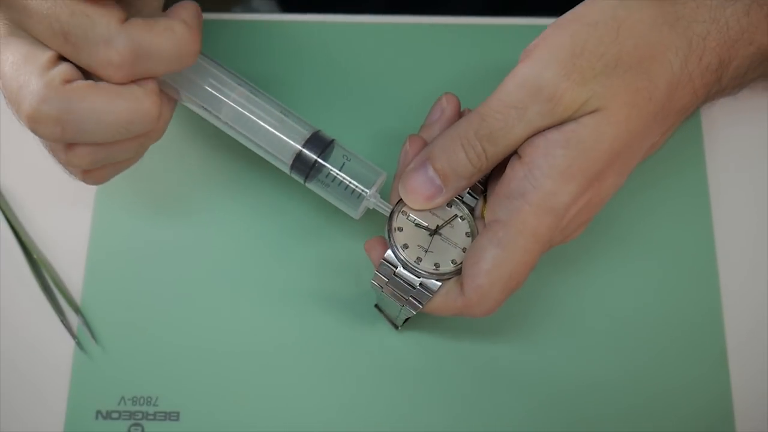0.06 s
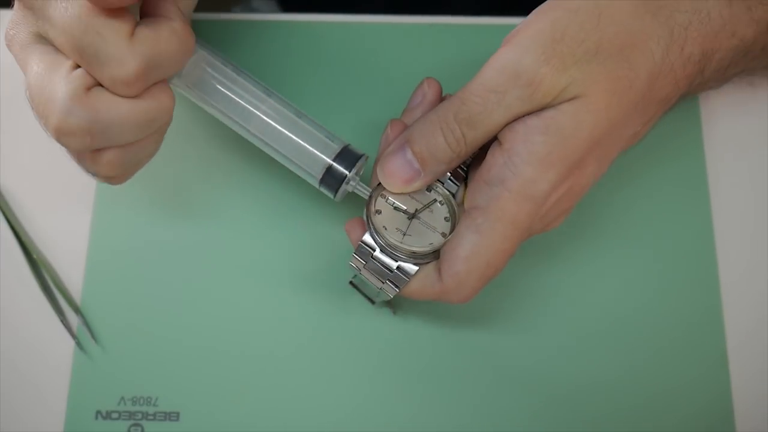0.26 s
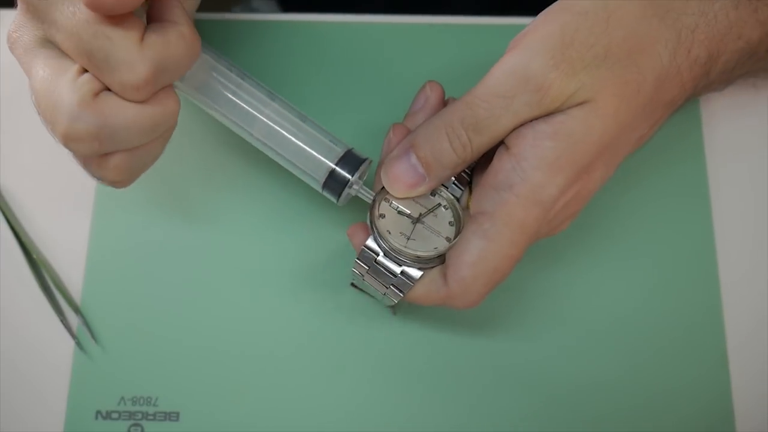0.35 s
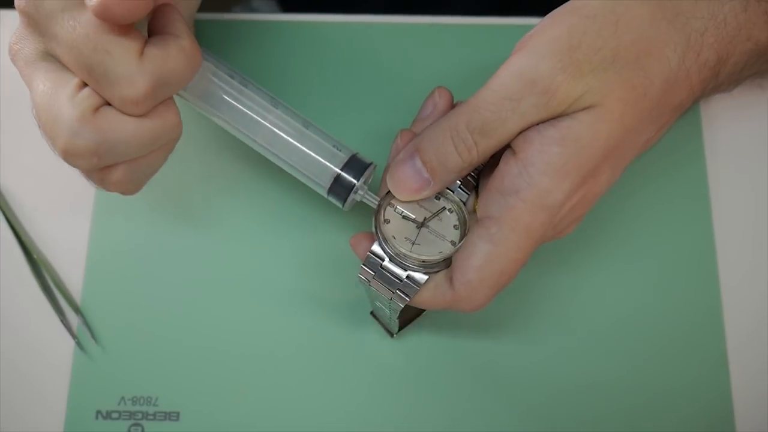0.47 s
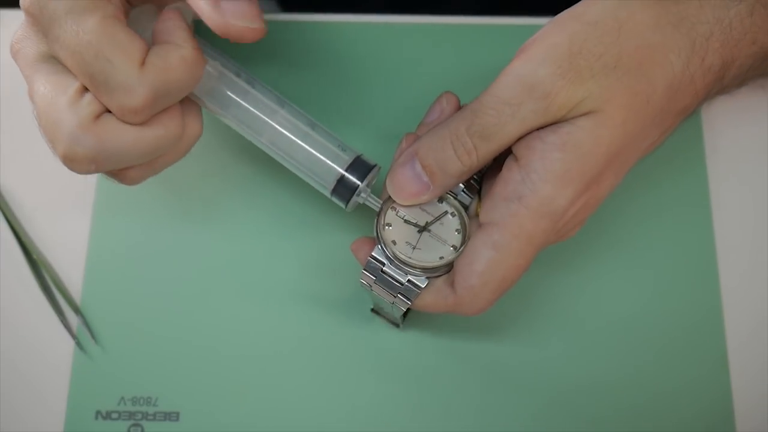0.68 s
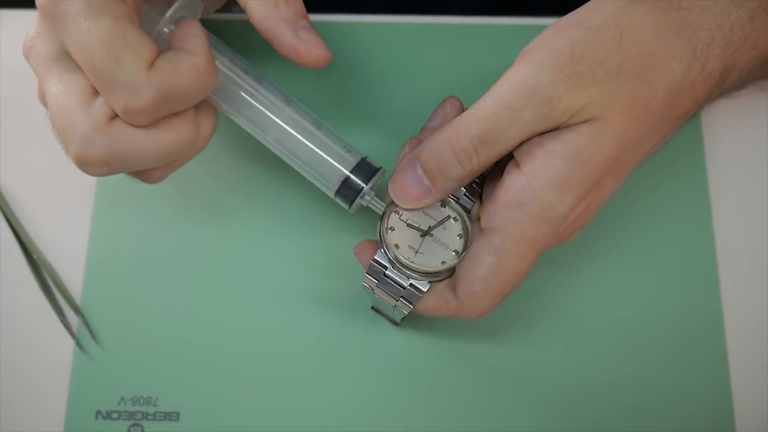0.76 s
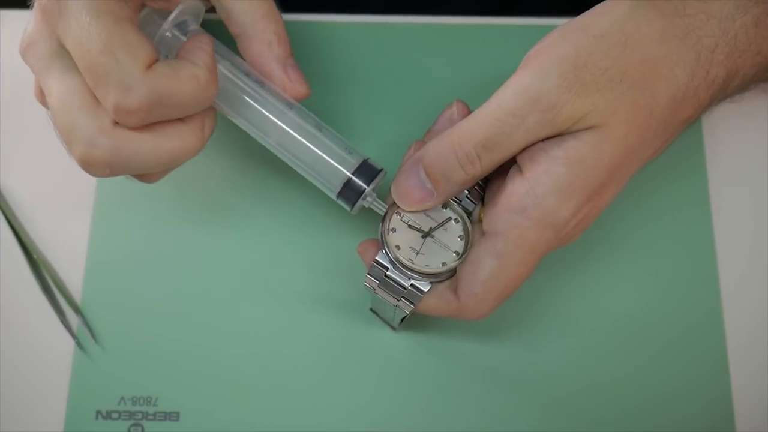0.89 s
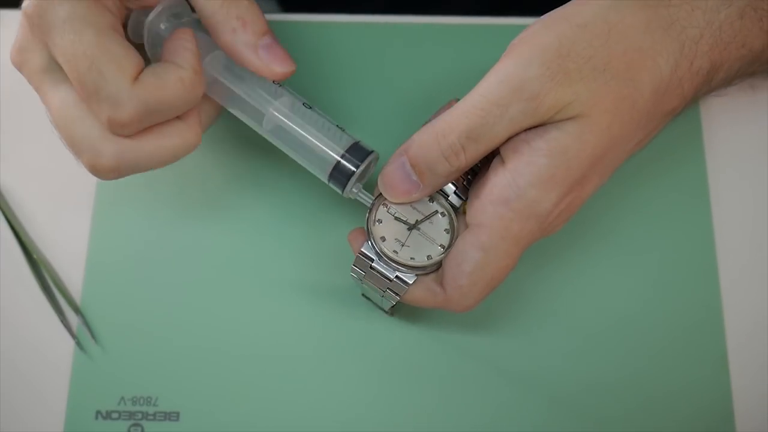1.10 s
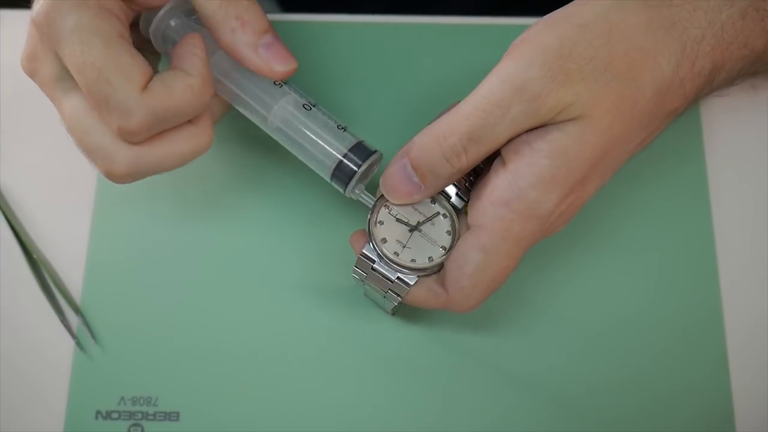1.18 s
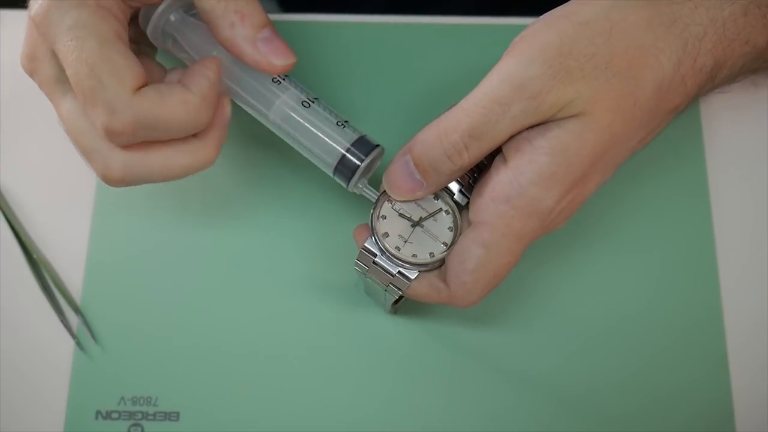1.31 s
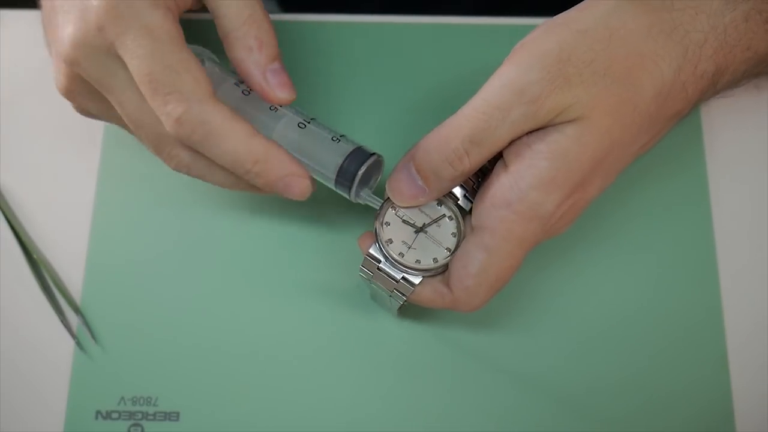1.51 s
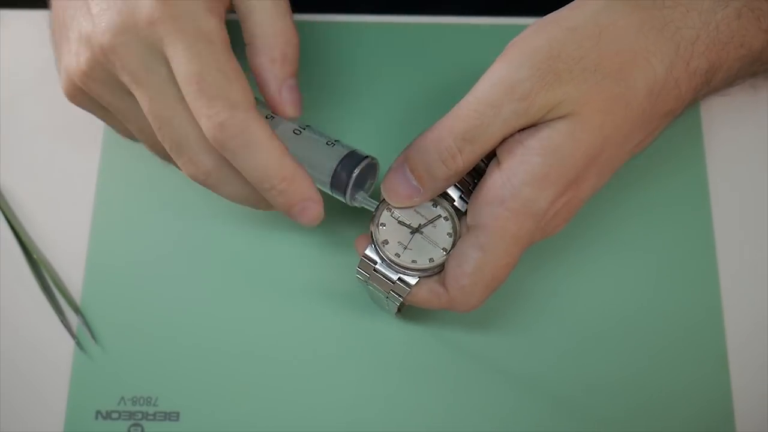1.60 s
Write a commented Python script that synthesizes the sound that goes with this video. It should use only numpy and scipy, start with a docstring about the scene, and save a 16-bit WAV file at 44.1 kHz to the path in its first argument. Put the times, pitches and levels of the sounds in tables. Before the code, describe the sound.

A sharp, loud pop bursts from a plastic syringe at about 0.2 seconds, close by, echoing briefly in a small room. A short hiss of air and a tiny snap follow. The plastic ticks lightly around 0.6 seconds. From 1.1 to 1.3 seconds come a faint finger slide, soft plunger knocks and thin clinks of a steel watch bracelet, over very quiet rustle and hum.

```python
"""In a small quiet room, a plastic syringe is pressed against a steel watch, close to the microphone.
The rubber seal slips and the trapped air lets go with one sharp pop that rings the barrel and watch
case and fills the room. A short hiss of air follows. Then the plastic ticks and knocks as the grip
changes, a finger slides along the barrel and the steel bracelet clinks, over a faint hiss and hum."""
import sys
import numpy as np
from scipy import signal
from scipy.fft import rfft, irfft, next_fast_len
from scipy.io import wavfile
from scipy.ndimage import uniform_filter1d

SR = 44100
rng = np.random.default_rng(int(sys.argv[2]) if len(sys.argv) > 2 else 0)


def master(y):
    """Save y as 16-bit WAV."""
    cut = np.clip(np.atleast_2d(y).T, -1, 1)
    pcm = np.round(cut * 32767)  # scale
    wavfile.write(sys.argv[1], SR, pcm.astype(np.int16))


N = 72765  # 1.65 seconds

# How the barrel and watch case ring. Each row: pitch in Hz, width in Hz, relative level in dB.
POP_MODES = [(248, 540, -9.5), (555, 130, -1), (1323, 200, -0.5), (2006, 180, 2.5), (2216, 290, -0.5),
             (3290, 490, -11), (3960, 220, -12), (5270, 820, -15.5), (9325, 1100, -25.5),
             (13800, 2400, -33.5)]
# Echoes from the desk and near things. Each row: delay in seconds, relative level in dB.
NEAR_ECHOES = [(.0011, -16), (.0044, -15)]
# Where the pop sits in stereo. Each row: frequency in Hz, left minus right in dB.
POP_BALANCE = [(30, -6), (120, 0), (500, 1), (2000, -1), (8000, 1.5)]
# Plastic ticks. Each row: start in seconds, level in dB, tilt toward the treble in dB per octave.
TICKS = [(.5911, -49.5, 3.5), (.5983, -38.5, 1), (.6308, -53.5, -0.5), (1.1362, -59, -8), (1.1455, -50, -6)]
# Plunger knocks and bracelet clinks. Each row: start in seconds, level in dB.
KNOCKS = [(.8125, -57.5), (1.1643, -44), (1.1671, -46), (1.3035, -53), (1.3135, -49), (1.3235, -52)]
CLINKS = [(.897, -61), (1.1660, -45), (1.1690, -50), (1.2028, -61.5), (1.2658, -59.5), (1.2982, -53.5),
          (1.3055, -55)]
# How each part rings. Each row: pitch in Hz, relative level in dB, seconds to fade by 60 dB (T60).
TICK_MODES = [(1860, -5, 0.013), (2280, -4, 0.022), (3140, -5, 0.012), (4730, 1, 0.006), (5105, -1, 0.011),
              (8700, -18.5, 0.0084)]
KNOCK_MODES = [(297, -14, 0.045), (547, -2.5, 0.032), (870, -10.5, 0.028), (1056, -4, 0.046),
               (1328, -11.5, 0.061), (1554, -4, 0.025), (2040, -7, 0.0078)]
CLINK_MODES = [(8198, -7, 0.045), (8802, -5, 0.012), (9370, -3.5, 0.02), (10350, -3.5, 0.0097),
               (12060, -16, .07)]
# Finger slides. Each row: loudest moment in seconds, width in seconds, level in dB.
SLIDES = [(0.539, 0.027, -73), (1.073, 0.053, -66.5)]
# How the rustle and hum swell. Each row: time in seconds, level in dB.
RUSTLE_LEVEL = [(0, -80), (.5, -73.5), (.66, -65.5), (.76, -73), (1, -69.5), (1.5, -69.5)]
HUM_LEVEL = [(.7, -76), (.85, -65.5), (1.1, -97), (1.3, -69.5)]
# The colour (mix of low and high) of each noise. Each row: frequency in Hz, relative level in dB.
POP_ROOM_COLOUR = [(40, -43.5), (85, -28), (130, -10), (210, -16.5), (380, -4), (620, -2), (760, -6),
                   (1020, -6.5), (1350, 0.5), (2350, -4), (2850, -20), (3500, -14.5), (5000, -22),
                   (6500, -31), (11000, -33), (15000, -45.5)]
JET_COLOUR = [(3000, -34), (5000, -2.5), (7500, -5), (8800, 1), (11500, -4.5), (15000, -22.5)]
SCUFF_COLOUR = [(300, -22.5), (900, -16.5), (1330, -1.5), (3000, -24.5), (12000, -42)]
SNAP_COLOUR = [(1200, -20), (2400, 3), (8000, -9.5), (11000, -14), (15000, -53)]
HARD_CONTACT_COLOUR = [(1500, -8), (7000, -7), (8500, -2), (13000, 1), (16000, -11)]
SOFT_CONTACT_COLOUR = [(80, -38), (380, 1), (1600, -8), (3400, -9.5), (15000, -51)]
SLIDE_COLOUR = [(2000, -17.5), (8200, -9.5), (9450, 6.5), (10500, -14), (15000, -27)]
RUSTLE_COLOUR = [(60, -12.5), (130, -1), (450, -4), (900, -13), (15000, -39)]
ROOM_TONE_COLOUR = [(25, -34), (140, -2.5), (274, -11.5), (800, -17.5), (1500, -20.5), (7500, -28.5),
                    (10200, -27.5), (14000, -31.5), (16000, -44)]
# Room notes that ring on after the pop. Each row: pitch in Hz, relative level in dB.
ROOM_MODES = [(532.9, -50), (635.2, -52.5), (1362, -56.5), (1593, -53), (2051, -54), (2342, -59.5)]
# How long the room echoes. Each row: frequency in Hz, seconds to fade by 60 dB.
ROOM_T60 = [(100, 1), (400, 0.53), (1500, 0.5), (5000, 0.44), (12000, .22)]
# Stereo width. Each row: frequency in Hz, level of the sides against the middle in dB.
ROOM_WIDTH = [(60, -6), (500, -11.5), (12000, -7.5)]
BACKGROUND_WIDTH = [(900, 2.5), (15000, -6.5)]

POP_S = .2327  # when the air lets go
# How long the wash after the pop stays level, probably from the recorder's automatic gain, before fading.
WASH_HOLD_S = .05


def pop(direct_db=-2, room_db=7, lag_s=7e-6):
    """One puff of air rings the barrel and watch case, and the room answers with a long wash."""
    start = round(POP_S * SR)
    puff = np.zeros(N)
    puff[start] = 1
    direct = filtered(puff, barrel_response)
    wash = np.pad(room_tail(POP_ROOM_COLOUR, WASH_HOLD_S), ((0, 0), (start, 0)))[:, :N]
    pair = amp(direct_db) * direct / np.abs(direct).max() + amp(room_db) * wash
    half = np.array([[.5], [-.5]])  # left and right each take half of the balance and lag
    return filtered(pair, lambda hz: amp(half * along(POP_BALANCE, hz))
                    * np.exp(2j * np.pi * hz * half * lag_s))


def barrel_response(hz, notch_hz=2824, notch_width_hz=1600):
    """The barrel and watch case boost some pitches and leave a hollow; near things add dull echoes."""
    body = sum((-1) ** k * amp(db) * 1j * hz * width / (pitch ** 2 - hz ** 2 + 1j * hz * width)
               for k, (pitch, width, db) in enumerate(POP_MODES))
    gap = notch_hz ** 2 - hz ** 2
    notch = gap / (gap + 1j * hz * notch_width_hz)
    echoes = sum(amp(db) * np.exp(-2j * np.pi * hz * delay) for delay, db in NEAR_ECHOES)
    return body * notch * (1 + echoes / (1 + 1j * hz / 4000))


def air_jet(hold_s=.086, fade_s=.037):
    """Swirling air spits out at the release, then the rest escapes with a short hiss."""
    t = since(POP_S)
    spit = decay(t, db=-20, t60=.0084) * noise(JET_COLOUR)
    hiss = amp(-50.5) * np.exp(-since(POP_S + hold_s) / fade_s) * stereo_noise(JET_COLOUR, ROOM_WIDTH)
    return (t > 0) * (spit + hiss)


def seal_scuff(start_s=.218, rise_s=.0012, db=-41.5):
    """The rubber seal starts to slip, with a brief scuff that stops at the pop."""
    rise = np.minimum(since(start_s) / rise_s, 1)
    return rise * (since(POP_S) == 0) * amp(db) * noise(SCUFF_COLOUR)


def snap(start_s=.3257):
    """A small dry snap sounds as the hiss ends."""
    t = since(start_s)
    return (t > 0) * decay(t, db=-34.5, t60=.022) * noise(SNAP_COLOUR)


def plastic_ticks():
    """The plastic ticks as the grip changes."""
    return struck(TICKS, TICK_MODES, HARD_CONTACT_COLOUR, crack_db=-32, room_db=-9)


def plunger_knocks():
    """The plunger bumps inside the barrel with dull knocks."""
    return struck(KNOCKS, KNOCK_MODES, SOFT_CONTACT_COLOUR, crack_db=-1.5, room_db=1)


def bracelet_clinks():
    """Steel links touch and ring high and thin."""
    return struck(CLINKS, CLINK_MODES, HARD_CONTACT_COLOUR, crack_db=-7.5, room_db=-1)


def struck(events, modes, colour, crack_db, room_db, near_fade_db_per_s=119):
    """Each contact makes a short crack and rings the part, never quite alike; the room answers."""
    def blow(start_s, db, tilt_db=0):
        t = since(start_s)
        ring = 0
        for k, (hz, mode_db, t60) in enumerate(modes):
            level_db = mode_db + tilt_db * np.log2(hz / 3000) + rng.normal(0, 1.5)
            tone = (-1) ** k * np.sin(2 * np.pi * hz * rng.normal(1, .004) * t)
            rise = 1 - np.exp(-2 * hz * t)
            ring += rise * decay(t, level_db, t60) * tone
        crack = (t > 0) * decay(t, crack_db, t60=.014) * noise(colour)
        return amp(db) * (ring + crack)
    direct = sum(blow(*row) for row in events)
    # Small sounds echo mostly off near things, so their echoes die sooner.
    tail = room_tail([(2500, -4), (9000, -2.5)], hold_s=0) * amp(-near_fade_db_per_s * since(0))
    echoes = signal.fftconvolve(direct[None], tail / np.linalg.norm(tail[0]), axes=1)[:, :N]
    return direct + amp(room_db) * echoes


def finger_slides(climb_hz_per_s=5300, grain_db=2.5):
    """A finger rubs the barrel with a thin, grainy hiss that climbs as the finger speeds up."""
    t = since(0)
    strokes = 0
    for peak_s, width_s, db in SLIDES:
        swell = amp(db) * np.exp(-.5 * ((t - peak_s) / width_s) ** 2)
        climb = np.exp(1j * np.pi * climb_hz_per_s * (t - peak_s) ** 2)
        strokes += swell * climb
    grain = amp(grain_db * unit(uniform_filter1d(rng.standard_normal(N), size=100)))
    hiss = unit(grain * stereo_noise(SLIDE_COLOUR, ROOM_WIDTH))
    return np.real(strokes * signal.hilbert(hiss))  # shifts all of the hiss in frequency


def rustle():
    """Skin and sleeve rub softly."""
    return level_curve(RUSTLE_LEVEL) * stereo_noise(RUSTLE_COLOUR, BACKGROUND_WIDTH)


def standing_waves():
    """The pop sets a few notes of the room ringing; they build up with the echoes and fade."""
    t = since(POP_S)
    ring = sum(amp(db) * np.sin(2 * np.pi * (hz * t + rng.random())) for hz, db in ROOM_MODES)
    rise = np.minimum(2 * t / WASH_HOLD_S, 1)
    return ring * rise * decay(since(POP_S + WASH_HOLD_S), db=4, t60=.7)


def room_tail(colour, hold_s, rise_s=.001):
    """The room's echoes build up and each frequency dies at its own speed; hold_s delays the fade."""
    hz, t, bands = signal.stft(stereo_noise(colour, ROOM_WIDTH), SR, nperseg=256)
    fade = decay(np.maximum(t - hold_s, 0), db=0, t60=along(ROOM_T60, hz)[:, None])
    rise = 1 - np.exp(-since(0) / rise_s)
    tail = rise * signal.istft(bands * fade, SR, nperseg=256)[1][:, :N]
    return tail / np.linalg.norm(tail[0])


def room_tone(hiss_db=-69, hum_hz=124, width_hz=4):
    """A faint hiss lies under everything, with a low hum that swells and wavers."""
    hum = unit(filtered(rng.standard_normal(N), lambda hz: 1 / (1 + ((hz - hum_hz) / width_hz) ** 2)))
    hiss = stereo_noise(ROOM_TONE_COLOUR, BACKGROUND_WIDTH)
    return amp(hiss_db) * hiss + level_curve(HUM_LEVEL) * hum


def amp(db):
    """Turn decibels into a multiplier."""
    return 10 ** (np.asarray(db) / 20)


def decay(t, db, t60):
    """A level that starts at db and drops 60 dB every t60 seconds."""
    return amp(db - 60 * t / t60)


def since(start_s):
    """Seconds since a moment, zero before it."""
    return np.maximum(np.arange(N) / SR - start_s, 0)


def level_curve(points):
    """A multiplier that glides through (seconds, dB) points."""
    return amp(np.interp(since(0), *np.transpose(points)))


def along(points, hz):
    """Read between (Hz, value) points on a log frequency scale."""
    freqs, values = np.transpose(points)
    return np.interp(np.log(hz + 1), np.log(freqs + 1), values)


def unit(x):
    """Scale to an average strength (rms) of 1."""
    return x / np.sqrt(np.mean(x ** 2) + 1e-20)


def filtered(x, response):
    """Multiply each frequency in x by response(hz)."""
    size = next_fast_len(x.shape[-1] + 8192)
    return irfft(rfft(x, size) * response(np.fft.rfftfreq(size, 1 / SR)), size)[..., :x.shape[-1]]


def noise(colour):
    """Noise of the given colour and strength 1."""
    return unit(filtered(rng.standard_normal(N), lambda hz: amp(along(colour, hz))))


def stereo_noise(colour, width):
    """Left and right noise whose width depends on frequency."""
    mid = noise(colour)
    side = filtered(noise(colour), lambda hz: amp(along(width, hz)))
    return np.array([mid + side, mid - side])


def scene():
    """The pop, the handling and the room together."""
    contacts = plastic_ticks() + plunger_knocks() + bracelet_clinks()
    release = seal_scuff() + pop() + standing_waves() + air_jet() + snap()
    return release + contacts + finger_slides() + rustle() + room_tone()


def record(dry):
    """The microphone thins the bass; the pop just overloads the recorder, which cuts the top treble."""
    low_cut_hz, top_hz = 46, 16300
    thin = filtered(dry, lambda hz: 1j * hz / (low_cut_hz + 1j * hz))
    clipped = thin / (1 + np.abs(thin) ** 10) ** (1 / 10)
    return filtered(clipped, lambda hz: 1 / (1 + (hz / top_hz) ** 80))


dry = scene()
out = record(dry)
master(out)
```